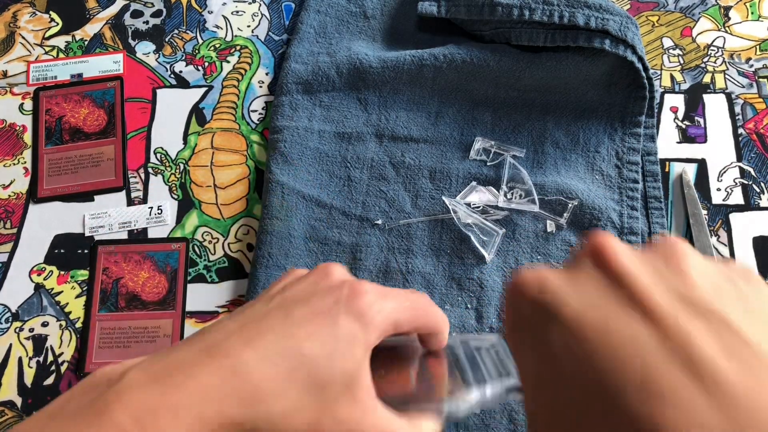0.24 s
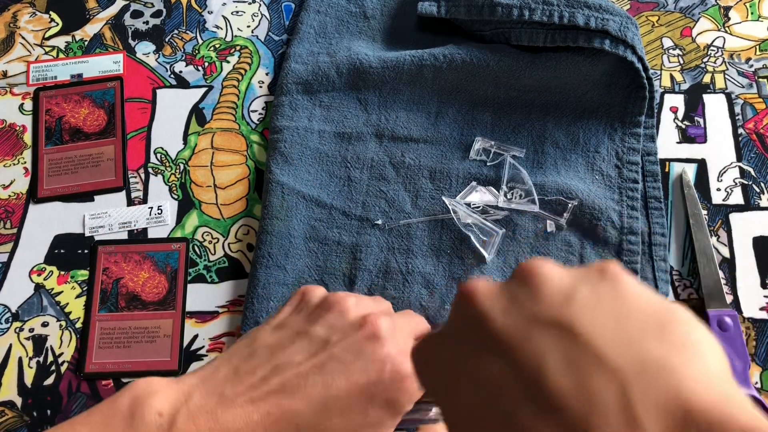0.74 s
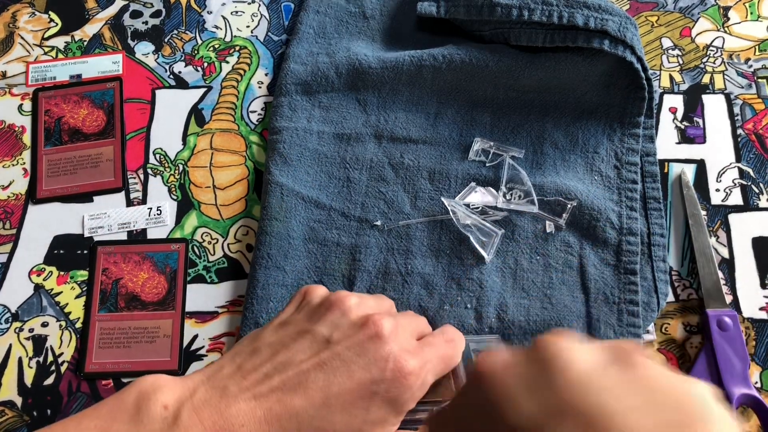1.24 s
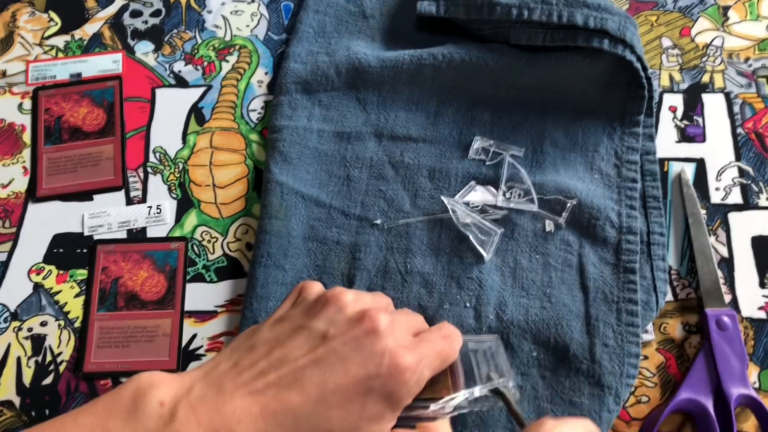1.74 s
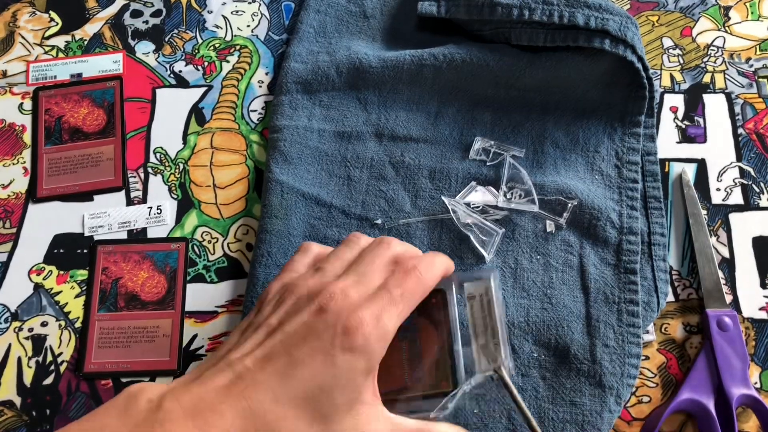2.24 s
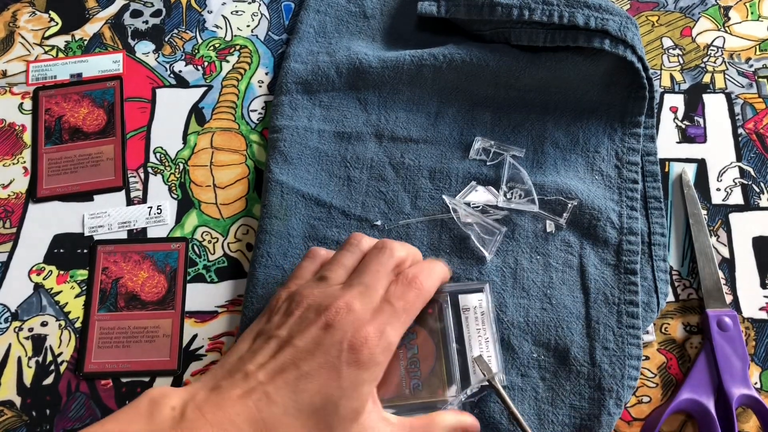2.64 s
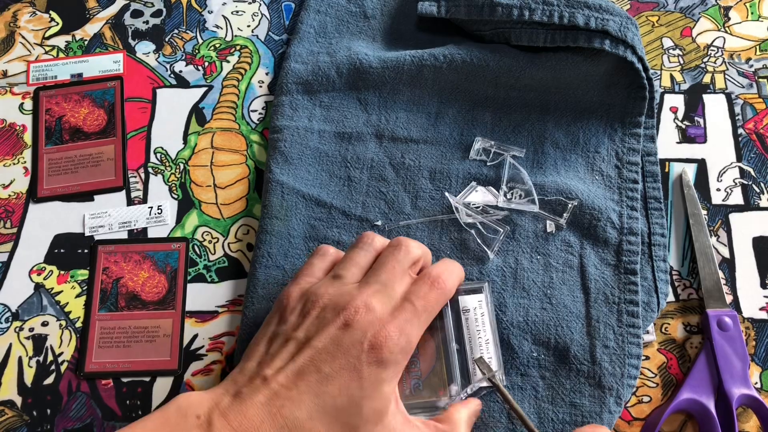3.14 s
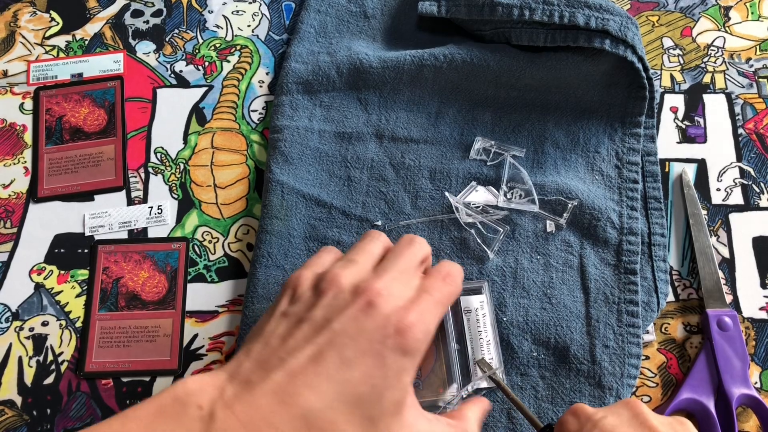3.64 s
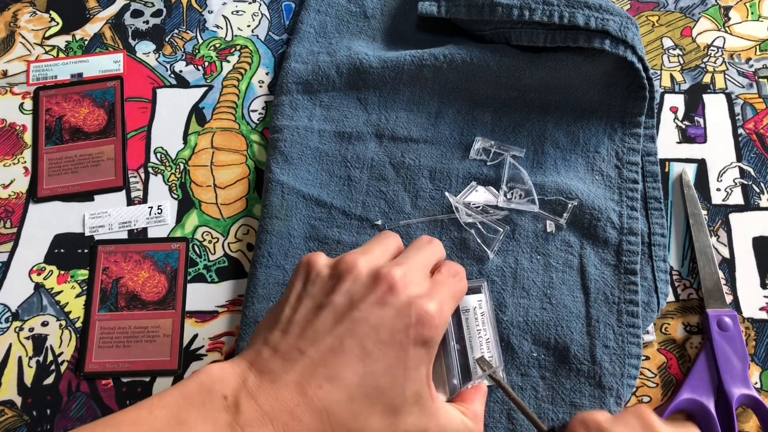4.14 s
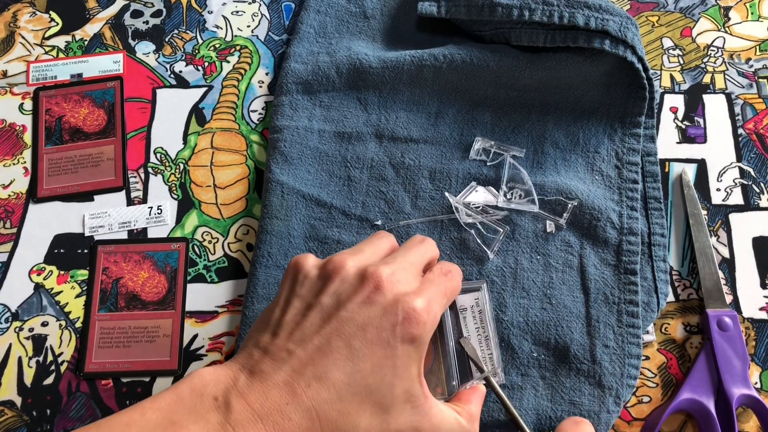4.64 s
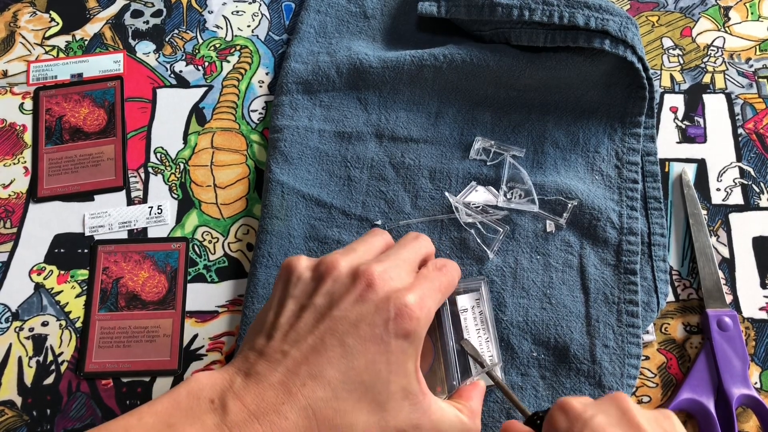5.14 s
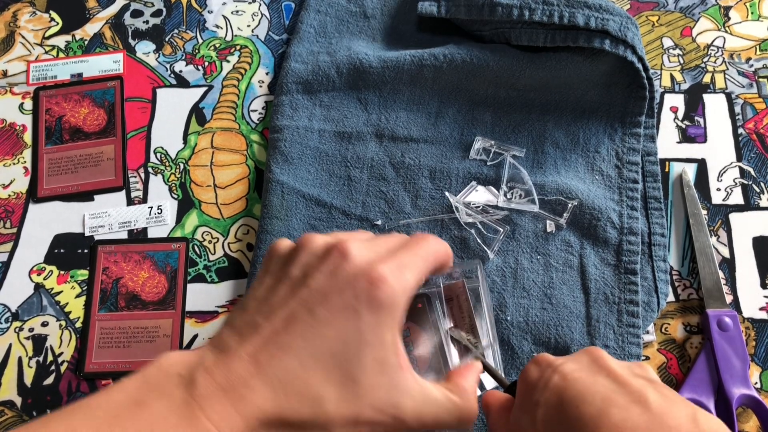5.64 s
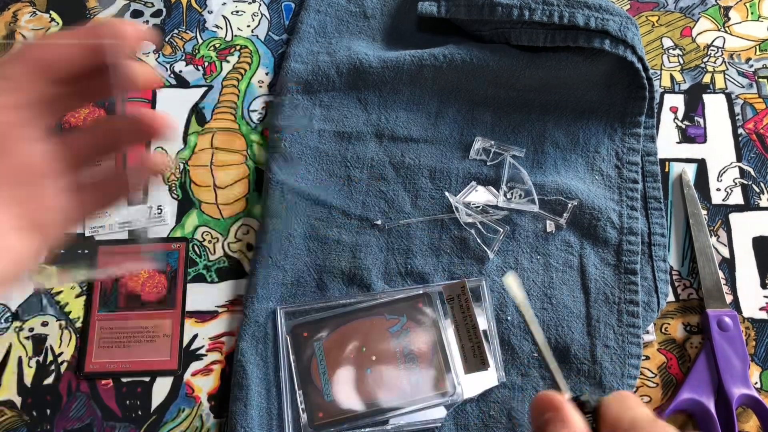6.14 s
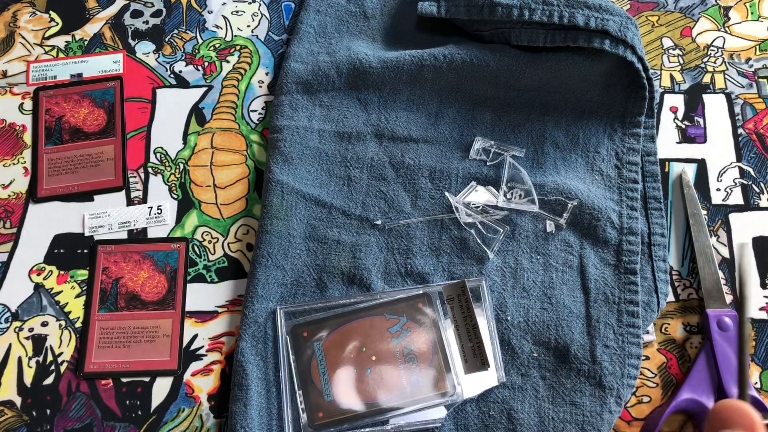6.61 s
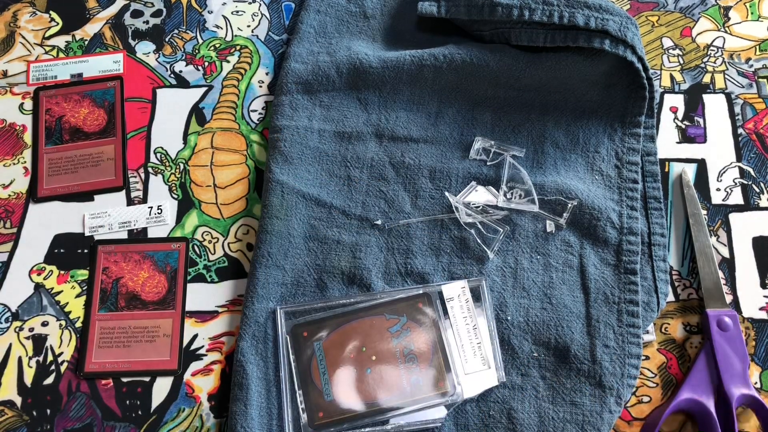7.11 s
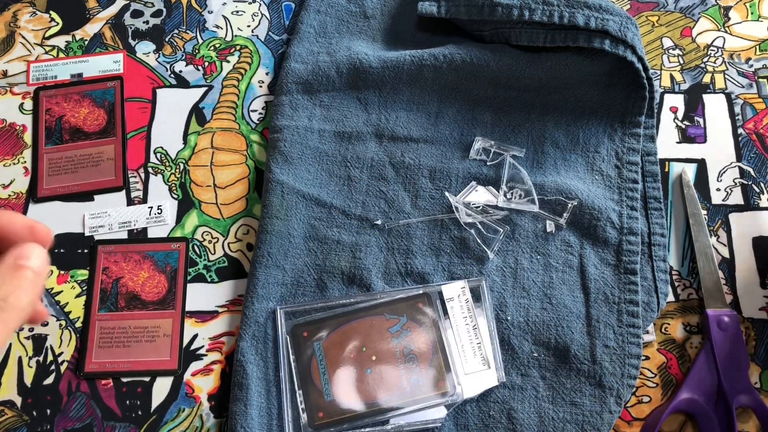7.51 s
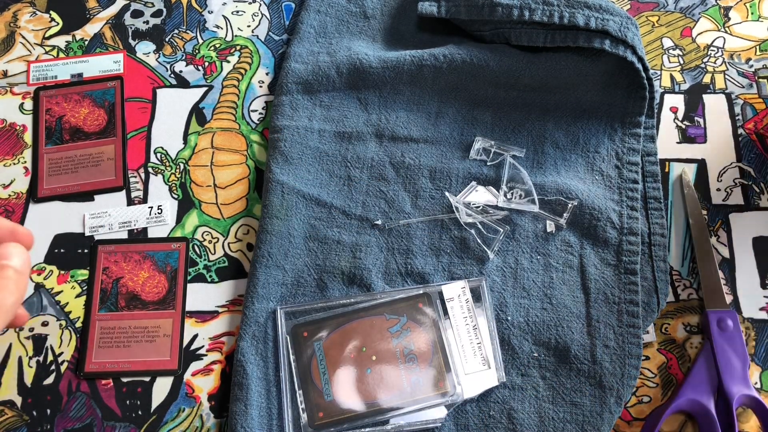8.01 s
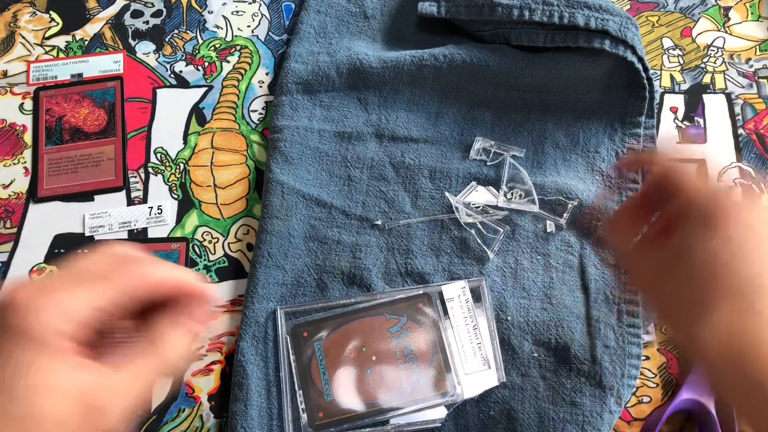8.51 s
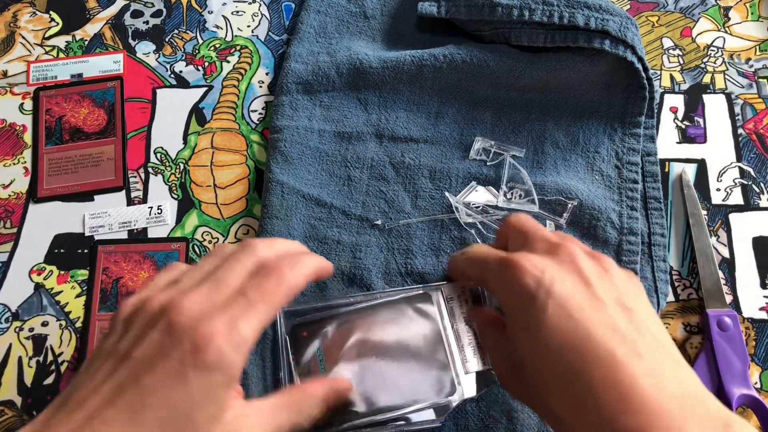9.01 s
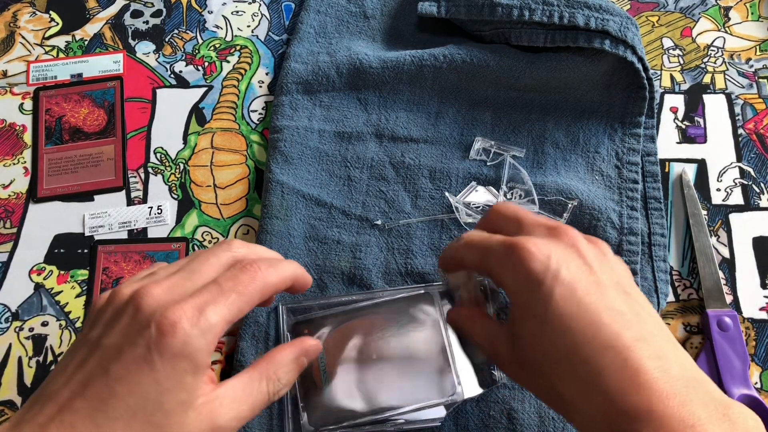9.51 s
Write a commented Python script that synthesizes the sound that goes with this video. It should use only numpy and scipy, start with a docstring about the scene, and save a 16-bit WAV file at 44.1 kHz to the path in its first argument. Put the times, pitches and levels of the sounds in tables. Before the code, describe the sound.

Brittle plastic snaps and crackles under a lever, a loose lid rattles, a handle knocks and rolls, faint birds chirp outside.

```python
"""A hard plastic card case is prised apart with a screwdriver on a padded desk in a bare, ringing room.
Its ticks and cracks are short filtered pulses; a freed part of the shell rings on as dying tones.
The loose lid bounces as noise bursts with ringing tones, and the screwdriver knocks, ticks and rumbles.
Each blow on the desk gives a dull thud. Small birds sing faintly outside as gliding, rasping whistles;
a short squeak of the blade is a thin whistle too. Behind it all lies the steady noise of room air."""
import sys
import numpy as np
from scipy import signal
from scipy.fft import rfft, irfft
from scipy.io import wavfile
from scipy.ndimage import uniform_filter1d

SR = 44100
rng = np.random.default_rng(int(sys.argv[2]) if len(sys.argv) > 2 else 0)


def master_out(mix):
    """Clip the mix to full scale and print it as 16-bit PCM to the path in sys.argv[1]."""
    frames = np.transpose(np.atleast_2d(mix))
    ceiling = np.clip(frames, -1, 1)
    pcm = np.round(ceiling * 32767).astype(np.int16)
    wavfile.write(sys.argv[1], SR, pcm)


N = 430416  # length of the scene in samples


def amp(db):
    """Turns decibels into a gain."""
    return 10 ** (np.asarray(db) / 20)


def unit(x):
    """Scales a signal or spectrum to rms 1."""
    return x / np.sqrt(np.mean(abs(x) ** 2) + 1e-20)


def read(points, hz):
    """Reads a table between its points, along a log-frequency axis."""
    f, value = np.transpose(points)
    return np.interp(np.log(hz + 1), np.log(f + 1), value)


def add(mix, s, sound):
    """Mixes a sound in at time s, cutting off what runs past the end."""
    part = mix[max(round(s * SR), 0):][:len(sound)]
    part += sound[:len(part)]


def clock(size):
    """Gives the time in seconds of each sample."""
    return np.arange(size) / SR


def noise(colour, size):
    """Makes noise of rms 1 whose spectrum has the shape of a colour table."""
    hz = np.fft.rfftfreq(size, 1 / SR)
    white = rfft(rng.standard_normal(size))
    return unit(irfft(white * amp(read(colour, hz)), size))


def fade(t, rise, t60):
    """A quick swell and an exponential decay that loses 60 dB in t60 seconds."""
    return (1 - np.exp(-t / rise)) * np.exp(-np.log(1000) * t / t60)


def sized(x, db, span):
    """Scales a blow so that its first span seconds have the rms level db."""
    return x * amp(db) / np.sqrt(np.mean(x[:int(span * SR)] ** 2) + 1e-20)


def ring(modes, t, rise, detune=0):
    """Dying tones; every blow lands elsewhere and so weights them differently, and a load may detune them."""
    hz, db, t60 = np.transpose(modes)[:, :, None]
    weight = amp(db + 1.7 * rng.standard_normal(hz.shape))
    hz = hz * (1 + detune * rng.standard_normal(hz.shape))
    tones = np.sin(2 * np.pi * (hz * t + rng.random(hz.shape)))
    return (weight * fade(t, rise, t60) * tones).sum(0)


def resonance(hz, centre_hz, q):
    """The spectrum of a damped resonance with steep skirts."""
    return unit(1 / (1 + 1j * q * (hz / centre_hz - centre_hz / hz)) ** 2)


# the case snapping and clicking under the blade:
# start_s, flex_hz, flex_db, rim_hz, rim_db, crack_hz, crack_db, room_db (thrown into the room)
SNAPS = [(1.173, 1080, -47, 2510, -50, 9430, -35.0, -13), (1.2593, 780, -55, 2850, -58, 6915, -40.5, -14),
         (1.5582, 1400, -37.5, 2960, -36, 5910, -15, -18),
         (1.5699, 1180, -37.5, 2040, -41, 8200, -25, -5.5), (1.601, 1284, -21, 1605, -20, 8170, -13.5, 2),
         (2.8787, 1370, -51.5, 2530, -49.5, 6230, -35.5, 0),
         (2.8996, 1600, -12, 2102, -16.5, 8000, -22, -15),
         (2.9843, 1570, -43, 2720, -41.5, 8310, -32.5, -9),
         (3.0318, 1280, -37, 2310, -40.5, 5790, -41.5, -10),
         (3.154, 1470, -38, 2940, -39, 7780, -31.5, -10), (3.1773, 1350, -27.5, 2550, -35, 7050, -29, -4),
         (3.184, 1550, -22.5, 2900, -26.5, 6490, -21.5, -6.5),
         (3.1883, 1460, -30.5, 3040, -27.5, 8170, -22.5, -7.5),
         (3.2, 1280, -25.5, 2310, -25.5, 4900, -18, -5.5),
         (3.2082, 1480, -36.5, 2950, -34.5, 7010, -27.5, -8),
         (3.2141, 1297, -11, 2460, -15, 5240, -9.5, -7), (3.2752, 1636, -21, 2490, -22, 6260, -11, -2),
         (3.5619, 1490, -43.0, 2570, -35, 5700, -25.5, -17),
         (3.597, 1140, -45, 2580, -35, 5727, -26.5, -12.5), (3.6485, 1180, -46, 2890, -40, 4820, -30, -5.5),
         (3.6584, 1470, -21, 2900, -21, 4870, -12.5, -7), (5.0562, 1440, -42.5, 2280, -38, 5970, -29, -19),
         (5.131, 1480, -47, 2290, -41, 6320, -35, -19), (5.161, 1300, -44.5, 2260, -36.5, 6730, -29, -12.5),
         (5.2125, 1380, -27, 2670, -29.5, 5960, -13.5, -8.5),
         (5.2331, 1700, -34, 2240, -26, 6670, -19.5, -11.5),
         (5.3237, 1800, -38.5, 2260, -37.5, 6940, -28.5, -17),
         (5.3308, 1680, -41, 2420, -38, 7750, -30, -17),
         (5.3698, 1870, -25.5, 2360, -37.5, 7460, -15.5, -19),
         (5.397, 1630, -30, 2490, -36.5, 7460, -26.5, -10.5),
         (5.425, 1350, -18, 1800, -20.5, 6830, -17, -7),
         (5.4352, 1406, -15, 2280, -20.0, 11510, -10, -15.5),
         (5.4422, 1754, -20, 2700, -23.5, 4360, -14, -8),
         (6.5257, 1099, -37.5, 1900, -43.5, 7500, -35.5, -11.5)]
# small cracks of the case, and taps of blade and fingers: start_s, tick_db, shell_db
SMALL_TICKS = [(0.3,-70,-50.5), (1.809,-43,-61), (2.809,-55,-67), (3.1495,-35,-45.5), (3.168,-37,-46.5),
               (4.2324,-59,-46.5), (4.4303,-63,-41), (4.985,-45,-41.5), (4.9958,-40.5,-44.5),
               (5.028,-60,-47), (5.7095,-52,-41.5), (5.728,-62,-46), (7.1016,-42.5,-67), (9.106,-68,-42),
               (9.3194,-47.5,-60), (9.483,-45.5,-57), (9.5324,-45.5,-50.5)]
# the plastic crazing under the lever, ever denser as the strain builds: start_s, end_s, loudest_db
STRAIN = [(2.869, 3.177, -46.5), (4.918, 5.422, -45.5)]
# middle pitches of small ticks, scattered anew for each: flex_hz, rim_hz, crack_hz
TICK_HZ = [1670, 2280, 7000]
TICK_RIM_DB, TICK_ROOM_DB = -8, -6.5  # rim against shell; share sent to the room
CRAZE_RANGE_DB, CRAZE_FLEX_DB = 12.5, -10  # spread of the crackles; shell against tick
# a crack louder than SHED_DB sheds splinters, weaker the later they come
SHED_DB, SPLINTER_DELAY_S, SPLINTER_DB, SPLINTER_FADE_DB_PER_S = -18.5, 0.076, -24, 64


def case():
    """Fractures, small ticks, crazing and splinters of the plastic: (near sound, what goes to the room)."""
    near, spread = np.zeros(N), np.zeros(N)
    crackle = []  # (s, dB)
    for start, end, db in STRAIN:
        for when, weak in rng.random(size=(18, 2)):
            # the square root crowds the crackles towards the end
            crackle.append((start + (end - start) * np.sqrt(when), db - CRAZE_RANGE_DB * weak))
    for s, *_, db, _ in SNAPS:
        if db > SHED_DB:
            for late in SPLINTER_DELAY_S * rng.exponential(size=7):
                crackle.append((s + late, db + SPLINTER_DB - SPLINTER_FADE_DB_PER_S * late))
    ticks = list(SMALL_TICKS) + [(s, db, db + CRAZE_FLEX_DB) for s, db in crackle]
    rows = list(SNAPS)
    for s, tick_db, shell_db in ticks:
        flex, rim, crack = np.array(TICK_HZ) * 2 ** (0.36 * rng.standard_normal(size=3))
        rows.append((s, flex, shell_db, rim, shell_db + TICK_RIM_DB, crack, tick_db, TICK_ROOM_DB))
    for s, *resonances, room_db in rows:
        ahead, around = snap(*resonances)
        add(near, s, ahead)
        add(spread, s, around * amp(room_db))
    return near, spread


def snap(flex_hz, flex_db, rim_hz, rim_db, crack_hz, crack_db):
    """A sharp crack rings the rim and flexes the shell: (towards the microphone, into the room)."""
    t, hz = clock(size=2048), np.fft.rfftfreq(2048, 1 / SR) + 1
    hiss = unit(amp(-1.5 * np.log2(hz)) / np.sqrt(1 + (3400 / hz) ** 7))
    parts = [(flex_db, resonance(hz, flex_hz, q=1.9)),
             (rim_db, resonance(hz, rim_hz, q=3.6)),
             (crack_db, 2.8 * hiss + resonance(hz, crack_hz, q=1.2))]
    # bending waves disperse: the treble arrives first
    pulse = np.exp(-4j * np.pi * .0006 * np.sqrt(1500 * hz)) * np.sqrt(0.0027 * SR)
    pulse /= np.sqrt(1 + (330 / hz) ** 8)  # the small shell radiates little bass
    # reflections from the rims ripple the spectrum; towards the room a floor keeps the dips shallow
    rims = unit(rfft(rng.standard_normal(len(t)) * fade(t, .0001, 0.011)))
    floored = abs(rims) + .5
    both_ways = []
    for ripple in (rims / np.sqrt(floored), floored):
        spectrum = sum(amp(db) * unit(part * ripple) for db, part in parts)
        both_ways.append(irfft(pulse * spectrum))
    return np.array(both_ways) * (t < .02)


# fractures that leave part of the shell free to ring: start_s, level_db
FREED = [(3.66, -28.5)]
# what the freed shell rings with: pitch_hz, level_db, t60_s
SHELL_MODES = [(873.84, -6, 0.038), (1516, 2, 0.021), (2326, 5, 0.0071), (3130, 3.5, 0.014)]


def shell():
    """Where a crack frees an edge, the shell rings on briefly as dying tones."""
    out, t = np.zeros(N), clock(size=4096)
    for s, db in FREED:
        add(out, s, sized(ring(SHELL_MODES, t, rise=0.000082), db, 0.095))
    return signal.sosfilt(signal.butter(2, 600, "high", fs=SR, output="sos"), out)


# the lid landing on a corner or an edge: start_s, clack_db, desk_thump_db
LID_HITS = [(6.722, -14, -38.5), (6.771, -21, -58), (6.786, -15, -37.5), (6.7916, -14, -35.5),
            (6.832, -18.5, -36.5)]
# what the lid rings with, before a small detuning: pitch_hz, level_db, t60_s
LID_MODES = [(1666, -1, 0.075), (1900.5, 10.5, 0.024), (2116, 0.5, 0.032), (3004, -0.5, 0.02854),
             (3930, -7, 0.09), (5653, -8.5, 0.033), (6800, -15, 0.045), (7270, -1, .04), (7680, -6.5, .025)]
# tone colour of the clack: pitch_hz, level_db
LID_COLOUR = [(60, -48), (300, -16), (900, -4.5), (1900, -4.5), (3000, -1.5), (4500, -2.5), (7800, 1.5),
              (10000, -7.5), (16000, -11)]


def lid():
    """The free lid bounces on its edges: each blow is a noisy clack with the lid's own tones."""
    out, t = np.zeros(N), clock(size=4096)
    for landing, landing_db, _ in LID_HITS:
        for s, db in bounces(landing, landing_db, count=4):
            clack = unit(noise(LID_COLOUR, size=len(t)) * fade(t, 0.00017, 0.038))
            tones = unit(ring(LID_MODES, t, rise=0.0013, detune=.025))
            add(out, s, sized(clack + amp(-7.0) * tones, db, 0.005))
    return out


# first gap between bounces, the shrinking of each next gap, and the level change per bounce
BOUNCE_S, BOUNCE_SHRINK, BOUNCE_DB = .0085, 0.92, -3.5


def bounces(s, db, count):
    """A landing and its ever quicker, ever weaker rebounds: (s, dB)."""
    blows = []
    for k in range(count):
        waited = BOUNCE_S * np.sum(BOUNCE_SHRINK ** np.arange(k))
        blows.append((s + waited, db + BOUNCE_DB * k))
    return blows


# the screwdriver put down and rocking to rest: start_s, handle_knock_db, shaft_tick_db
TOOL_HITS = [(7.853, -54, -70), (8.1232, -21.5, -43), (8.1616, -27.5, -44), (8.169, -41, -34.5),
             (8.183, -34, -41), (8.228, -39.5, -59), (8.256, -38, -41), (8.266, -43, -43),
             (8.285, -35, -41), (8.312, -40.5, -40.5), (8.378, -43.5, -60), (8.426, -46, -50)]
# tone colours of the handle's knock, the shaft's tick and the handle's rolling: pitch_hz, level_db
HANDLE_COLOUR = [(150, -20), (350, 5), (600, 3), (900, -1.5), (1400, -2), (2500, -16), (5000, -67)]
SHAFT_COLOUR = [(500, -23), (2500, 2), (4000, 1), (5600, 6), (7200, -4), (10000, -4), (15000, -13)]
ROLL_COLOUR = [(90, -46), (200, -10.5), (255, 12), (320, -8.5), (520, -8.5), (720, -23.5), (950, -11),
               (1400, -27), (6000, -37), (16000, -64)]
# level of the handle's rumble as it rolls unevenly over the desk: time_s, level_db
ROLL_LEVEL = [(7.848, -70), (7.857, -36.5), (7.896, -47.5), (7.922, -37), (7.98, -46), (8.12, -41),
              (8.3, -65)]
SHAFT_HZ, PING_DB, PING_ABOVE_DB = 7100, -14.5, -36  # the steel shaft's ping, and the tick that wakes it


def screwdriver():
    """The handle rolls, knocks and rocks to rest while the steel shaft ticks; only a hard tick makes it ping."""
    out, t = np.zeros(N), clock(size=4096)
    for s, knock_db, tick_db in TOOL_HITS:
        knock = noise(HANDLE_COLOUR, size=len(t)) * fade(t, 0.00042, 0.028)
        add(out, s, sized(knock, knock_db, 0.0047))
        tick = noise(SHAFT_COLOUR, size=len(t)) * fade(t, 0.00025, 0.02)
        add(out, s, sized(tick, tick_db, 0.0033))
        if tick_db > PING_ABOVE_DB:
            ping = np.sin(2 * np.pi * SHAFT_HZ * t) * fade(t, 0.0003817, 0.009)
            add(out, s, amp(PING_DB) * ping)
    rumble = noise(ROLL_COLOUR, size=N)
    rumble /= np.sqrt(uniform_filter1d(rumble ** 2, size=900))  # evens out its chance swells
    roll_db = np.interp(clock(size=N), *np.transpose(ROLL_LEVEL), left=-np.inf, right=-np.inf)
    return out + rumble * amp(roll_db)


# hand and case bumping the desk: start_s, thud_centre_hz, level_db
THUMPS = [(0.3, 119.6, -62), (1.217, 245, -48.5), (1.521, 210, -42), (1.61, 136, -34.5), (3.228, 430, -44),
          (3.287, 290, -40.5), (3.668, 260, -49.5), (4.988, 180, -52), (5.224, 200, -45.5),
          (5.446, 205.6, -32.5), (7.754, 255, -52.5)]
# what the desk rings with, before a small detuning: pitch_hz, level_db, t60_s
DESK_MODES = [(116, -3, 0.26), (199.9, -3.5, 0.3), (245.8, 4.5, 0.13)]
LANDING_HZ = 175  # centre of the thud under lid and screwdriver
TOOL_THUMP_DB = -13  # the desk's answer, against the knock of the handle


def desk():
    """Hand, lid and screwdriver each give a dull thud through the cloth, which wakes the desk's tones near it."""
    out, t = np.zeros(N), clock(size=16384)
    hz = np.fft.rfftfreq(len(t), 1 / SR) + 1
    from_lid = [(s, LANDING_HZ, thump_db) for s, _, thump_db in LID_HITS]
    from_tool = [(s, LANDING_HZ, knock_db + TOOL_THUMP_DB) for s, knock_db, _ in TOOL_HITS]
    for s, centre_hz, db in list(THUMPS) + from_lid + from_tool:
        colour = resonance(hz, centre_hz, q=0.8)
        thud = unit(irfft(rfft(rng.standard_normal(len(t))) * colour) * fade(t, 0.0024, 0.09))
        tones = unit(ring(DESK_MODES, t, rise=0.006, detune=0.014))
        boom = irfft(rfft(tones) * colour) / abs(colour).max()
        add(out, s, sized(thud + amp(3.0) * boom, db, 0.058))
    return signal.sosfilt(signal.butter(2, 60, "high", fs=SR, output="sos"), out)


# a bird alternating a high and a low syllable (rasp and scoop are shares of the pitch):
# first_s, until_s, every_s, high_start_hz, high_end_hz, high_rasp, high_scoop, high_level_db
BIRD_SONG = [(.012, .76, .165, 5400, 5300, .17, 0, -67), (4.386, 4.9, .188, 8400, 4450, .05, .33, -63)]
# single bird calls: start_s, length_s, start_hz, end_hz, level_db
BIRD_NOTES = [(.85,0.058,5400,5900,-69), (0.899,0.018,3666,5200,-64.5), (2.554,0.0709,4300,3170,-72),
              (4.13,0.067,5230,3140,-59.5), (4.295,0.033,2740,1777,-62.5), (6.238,0.16,2730,3024,-80),
              (6.533,0.044,4560,4400,-62.5), (6.655,0.04,3310,1866,-61), (7.363,0.029,6680,5937,-66),
              (7.441,0.05943,3622,3850,-72), (8.641,0.05665,2804,3070,-65), (8.753,0.097,3358,4250,-59),
              (9.095,0.079,4558,2716,-60.5), (9.301,0.04952,5516,4420,-57), (9.388,0.1,6350,4800,-63),
              (9.482,0.04645,1914,2280,-61), (9.527,0.034957,2680,2930,-59), (9.587,0.095,6120,3830,-63.5),
              (9.701,0.04,4480,4239,-54.5)]
# harsh churrs and trills: start_s, length_s, pitch_hz, level_db
CHURRS = [(0.744, 0.31, 2490, -64.5), (5.977, 0.32, 2300, -73), (6.179, 0.38, 4194, -78),
          (8.879, 0.51, 2420, -71)]
HIGH_LENGTH_S = .056
# the low syllable comes midway between the high ones, each time a little different in pitch
LOW_LENGTH_S, LOW_START_HZ, LOW_END_HZ, LOW_DB = .05, 3650, 1910, -66
LOW_SCOOP, LOW_RASP, LOW_DETUNE = 0.59, 0.05, 0.03  # shares of the pitch
CLEAR_RASP, RASP_PER_OCTAVE, CHURR_RASP = 0.003, 0.13, 0.06  # shares of the pitch


def birds():
    """A two-note song, single calls and churrs; the farther a single call falls, the more it rasps."""
    out = np.zeros(N)
    for first, until, every, start_hz, end_hz, rasp, scoop, db in BIRD_SONG:
        for s in np.arange(first, until, every):
            add(out, s, amp(db) * whistle(HIGH_LENGTH_S, start_hz, end_hz, rasp, scoop))
            detune = 1 + LOW_DETUNE * rng.standard_normal(size=2)
            start, end = np.array([LOW_START_HZ, LOW_END_HZ]) * detune
            add(out, s + every / 2, amp(LOW_DB) * whistle(LOW_LENGTH_S, start, end, LOW_RASP, LOW_SCOOP))
    for s, length, start_hz, end_hz, db in BIRD_NOTES:
        octaves_fallen = max(np.log2(start_hz / end_hz), 0)
        rasp = CLEAR_RASP + RASP_PER_OCTAVE * octaves_fallen
        add(out, s, amp(db) * whistle(length, start_hz, end_hz, rasp))
    for s, length, hz, db in CHURRS:
        add(out, s, amp(db) * whistle(length, hz, hz, CHURR_RASP))
    return out


# thin notes: a bird piping, and at 2.696 s a short squeak of the blade:
# start_s, length_s, pitch_hz, level_db
THIN_NOTES = [(2.14, .06, 2915, -74), (2.24, .08, 2900, -70.5), (2.36, .045, 2950, -68),
              (2.422, 0.054, 2960, -68), (2.696, 0.0117, 5860, -48.5), (2.78, .13, 2966, -64),
              (2.92, .21, 2990, -63.5)]


def thin_notes():
    """A bird's piping and a squeak of the blade: thin whistles that hold one pitch and hardly rasp."""
    out = np.zeros(N)
    for s, length, hz, db in THIN_NOTES:
        add(out, s, amp(db) * whistle(length, hz, hz, CLEAR_RASP))
    return out


VIBRATO_HZ = 190.45  # about how fast the pitch shakes; the rate wanders
GLIDE_EASE = 1.9  # a glide starts fast and settles on its last pitch
SCOOP_SHARE = 0.24  # how early in the note the upward scoop happens, as a share of its length


def whistle(length, start_hz, end_hz, rasp, scoop=0):
    """A gliding whistle of rms 1; a fast, uneven vibrato makes it rasp."""
    u = np.linspace(0, 1, int(length * SR))
    hz = end_hz + (start_hz - end_hz) * (1 - u) ** GLIDE_EASE
    hz *= 1 - scoop * np.exp(-(u / SCOOP_SHARE) ** 2)
    wander = unit(uniform_filter1d(rng.standard_normal(len(u)), size=100))
    rate = VIBRATO_HZ * (1 + .5 * wander)
    shake = unit(np.sin(2 * np.pi * np.cumsum(rate) / SR))
    swell = amp(4.0 * unit(uniform_filter1d(rng.standard_normal(len(u)), size=700)))
    tone = np.sin(2 * np.pi * np.cumsum(hz * (1 + rasp * shake)) / SR)
    return unit(tone * swell * signal.windows.tukey(len(u), .3))


# how long the room rings: pitch_hz, t60_s
ROOM_T60 = [(100, 0.3), (300, 0.52), (700, 0.63), (1600, 0.92), (3000, 0.8), (5500, 0.76), (8000, 0.58),
            (11000, 0.44), (15500, 0.28)]
# tone colour of the room: pitch_hz, level_db
ROOM_COLOUR = [(100, -3), (300, 14.5), (800, 6.5), (1500, -2.5), (3000, -1.5), (7000, -3.5), (11000, -4.5),
               (15500, -8), (16500, -30)]
# first echoes from walls and ceiling: delay_s, level_db
ECHOES = [(0.013, -23), (0.0129, -20), (0.0156, -19), (0.0289, -23), (.0342, -14.5), (.037, -23.5)]


def room(x, tail_db, gap):
    """Single wall echoes and, after a short gap, a dense tail whose middle pitches ring longest."""
    taps = rng.standard_normal(SR) * (rng.random(SR) < .15)  # one second of random reflections
    hz, t, z = signal.stft(taps, SR, nperseg=256)
    decay = np.exp(-np.log(1000) * t / read(ROOM_T60, hz)[:, None])
    z = z * amp(read(ROOM_COLOUR, hz))[:, None] * decay
    tail = signal.istft(z, SR)[1][:SR]
    age = clock(size=SR) - gap
    # swells in over 10 ms, a little stronger at first
    tail *= np.clip(age / 0.01, 0, 1) * (1 + 0.21 * np.exp(-abs(age) / 0.058))
    response = amp(tail_db) * tail / np.linalg.norm(tail)
    for delay, db in ECHOES:
        add(response, delay, amp([db]))
    return signal.fftconvolve(x, response)[:N]


# tone colour of the quiet room air: pitch_hz, level_db (per Hz, only the shape counts)
AIR = [(15, -32.5), (25, -12.5), (60, 3), (120, 0.5), (200, 1), (400, -6), (600, -6), (900, -15),
       (1300, -12.5), (2500, -21), (4200, -22), (7500, -31), (15000, -38)]
AIR_DB = -60.5


def air():
    """Quiet room air: steady noise, strongest in the bass."""
    return amp(AIR_DB) * noise(AIR, size=N)


def scene():
    """Mixes every source directly, all but the thin notes also through the room, and adds the air."""
    near, spread = case()
    ringing, clatter, tool, boom, song = shell(), lid(), screwdriver(), desk(), birds()
    direct = near + ringing + clatter + tool + boom + thin_notes() + amp(2.5) * song
    send = spread + amp(-6.5) * ringing + amp(-9) * clatter + amp(-9.0) * tool
    send = send + amp(-11.5) * boom + song
    return (direct + room(send, tail_db=-2.0, gap=0.0092) + air())[None]


EDGE_HZ = 16300  # upper limit of the treble


def record(dry):
    """Lifts the level a little and rounds off the sharpest peaks; then limits the treble."""
    held = 1.4001 * np.tanh(dry / 1.1184)
    lowpass = signal.firwin(255, EDGE_HZ, window=("kaiser", 9), fs=SR)
    return signal.oaconvolve(held, lowpass[None], "same")


dry = scene()
out = record(dry)
master_out(out)
```